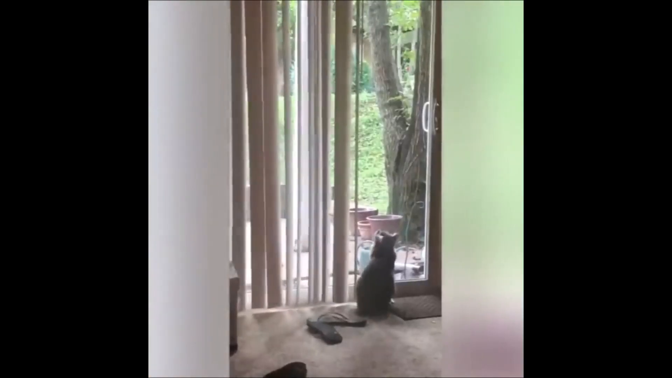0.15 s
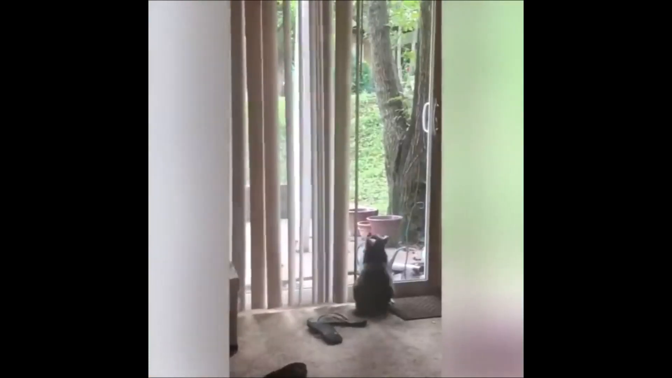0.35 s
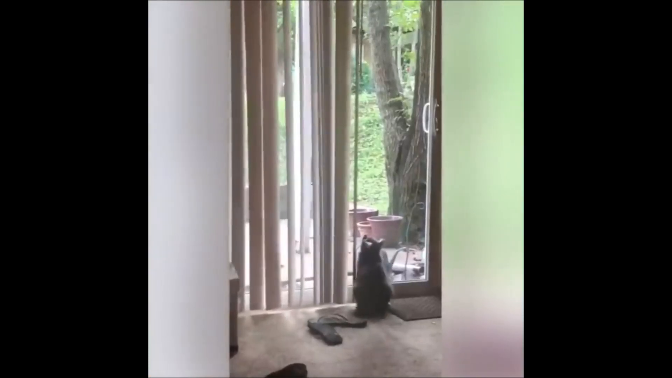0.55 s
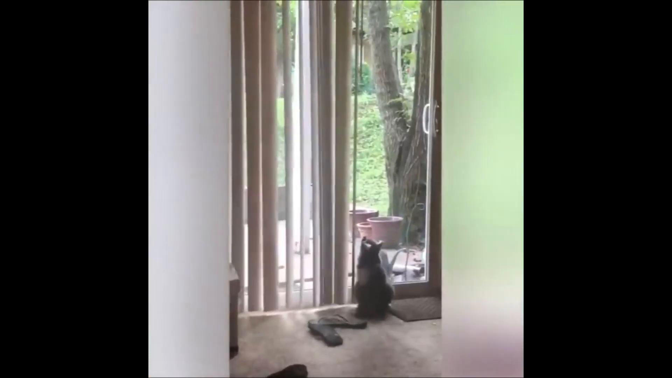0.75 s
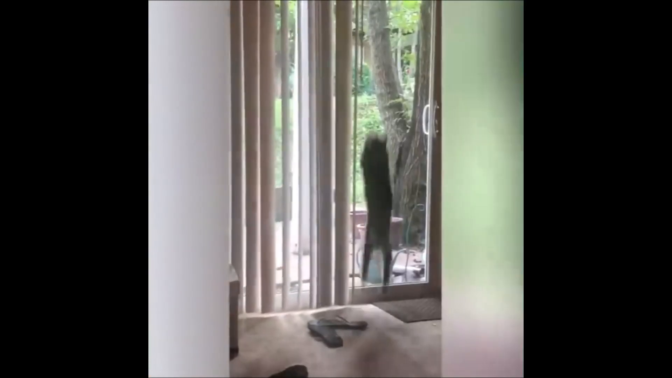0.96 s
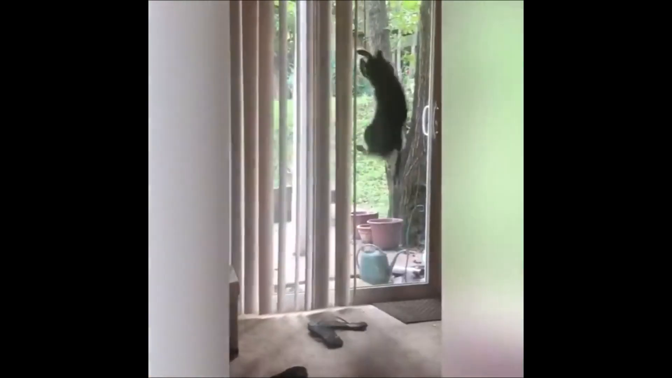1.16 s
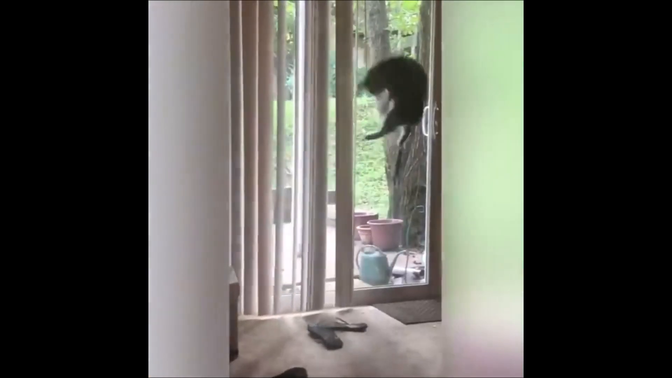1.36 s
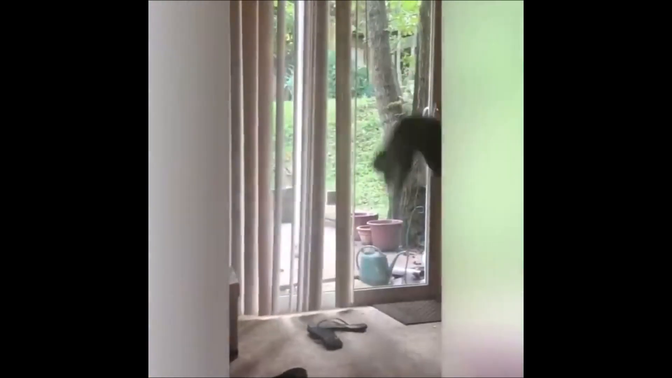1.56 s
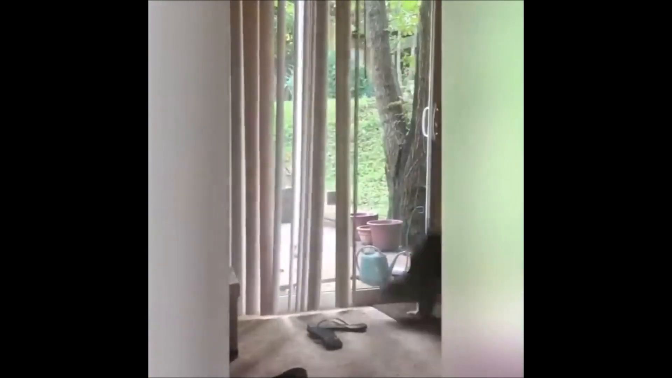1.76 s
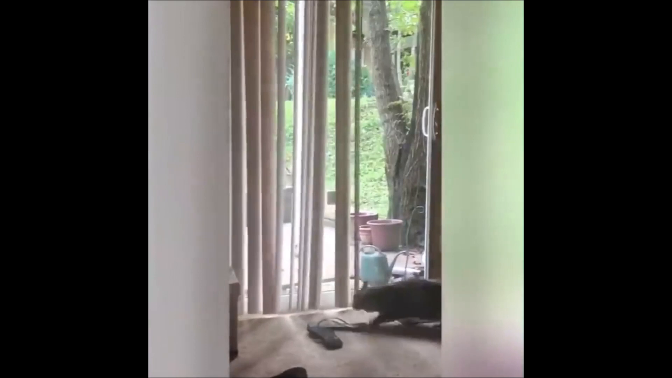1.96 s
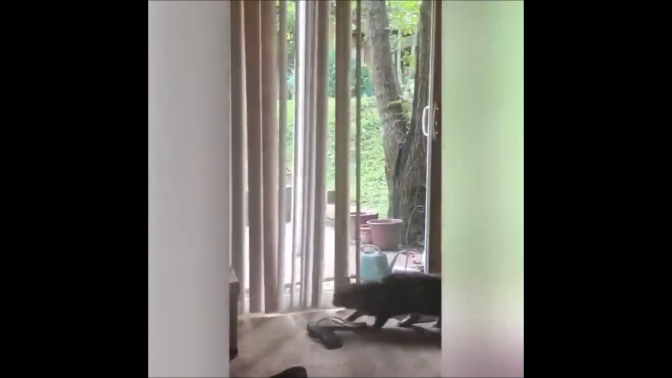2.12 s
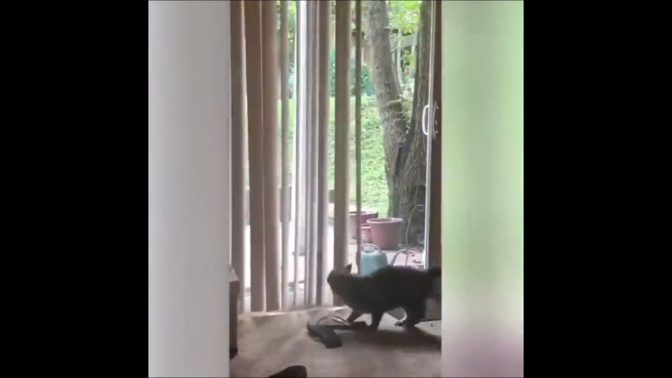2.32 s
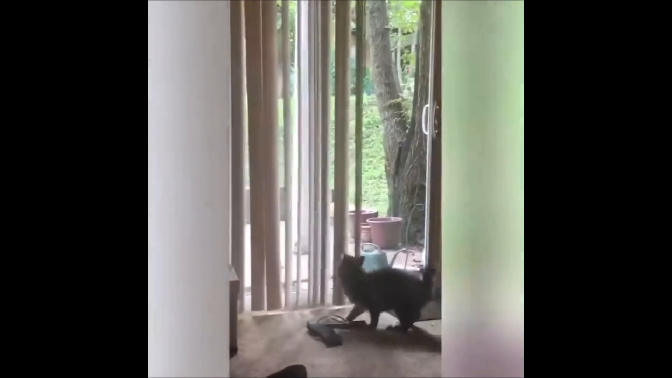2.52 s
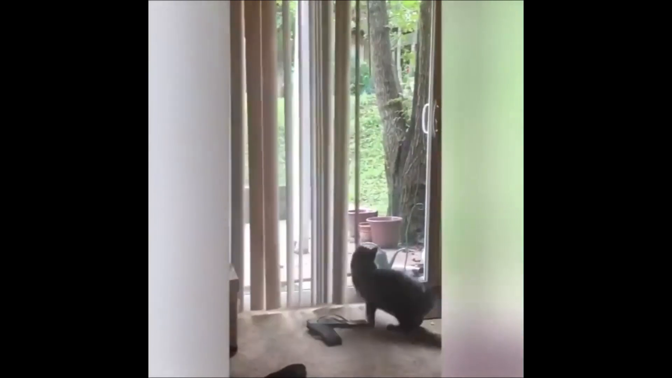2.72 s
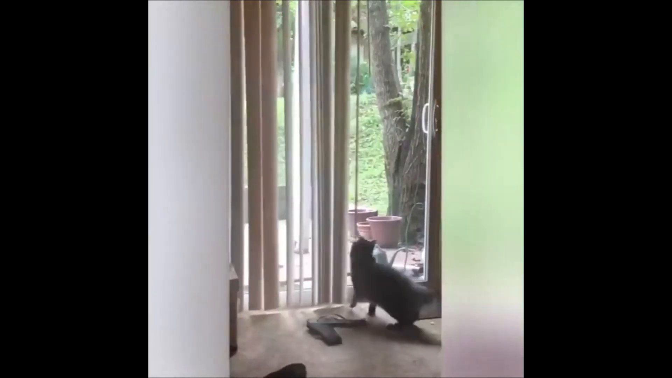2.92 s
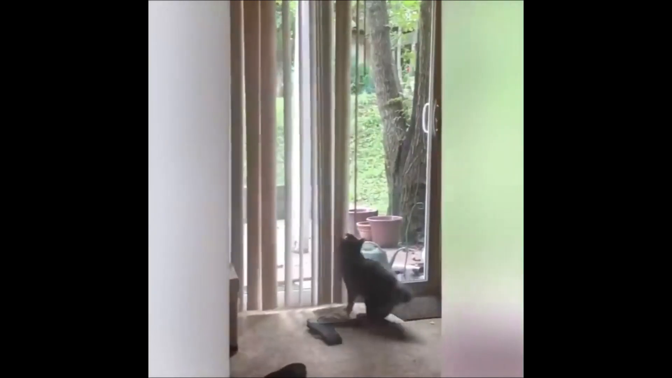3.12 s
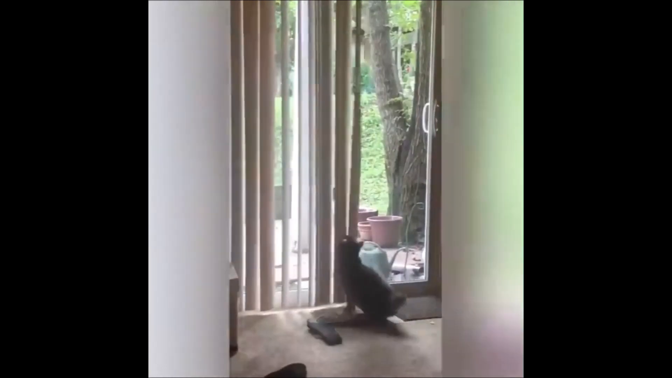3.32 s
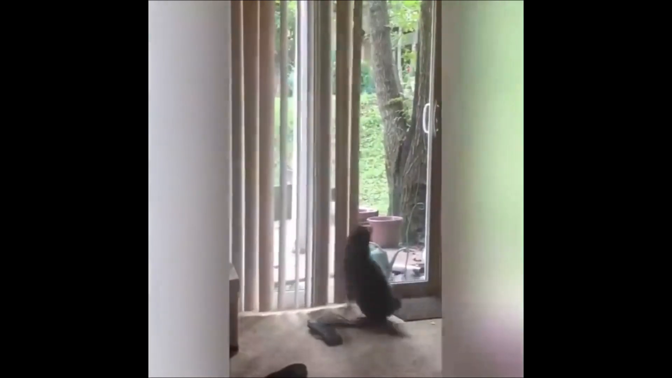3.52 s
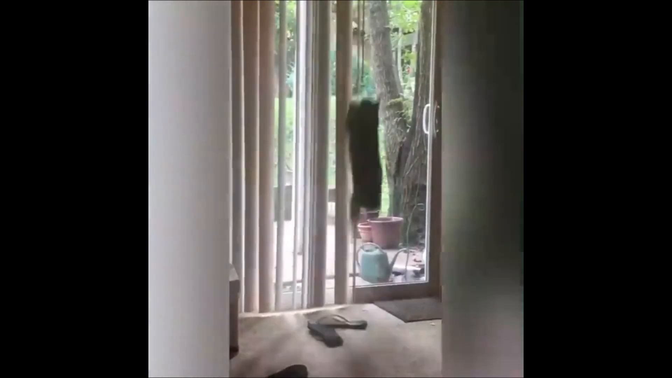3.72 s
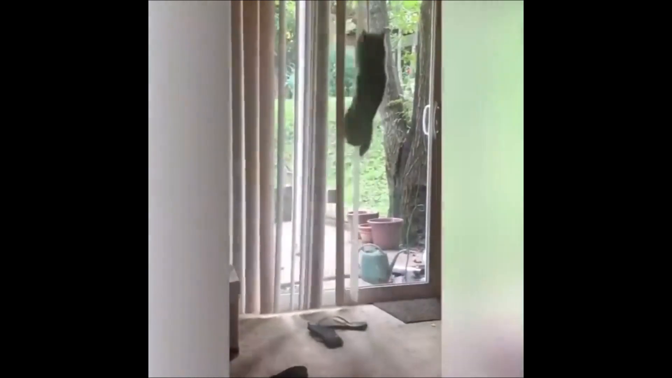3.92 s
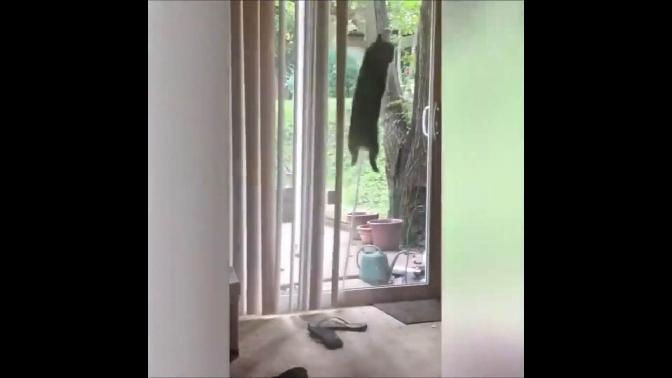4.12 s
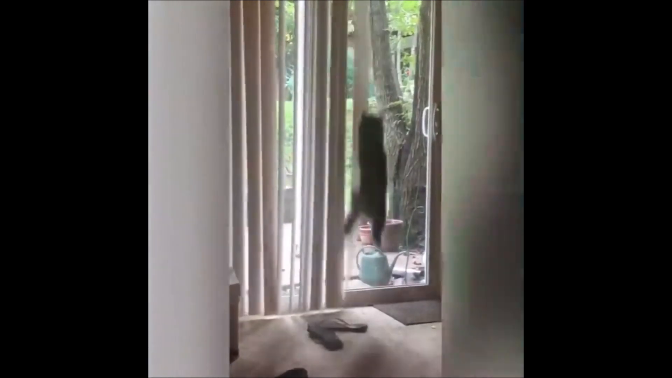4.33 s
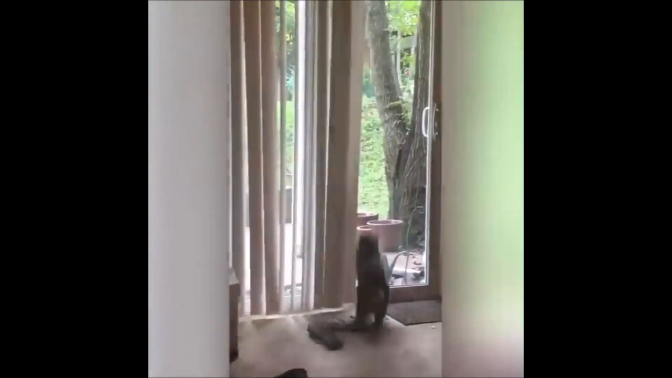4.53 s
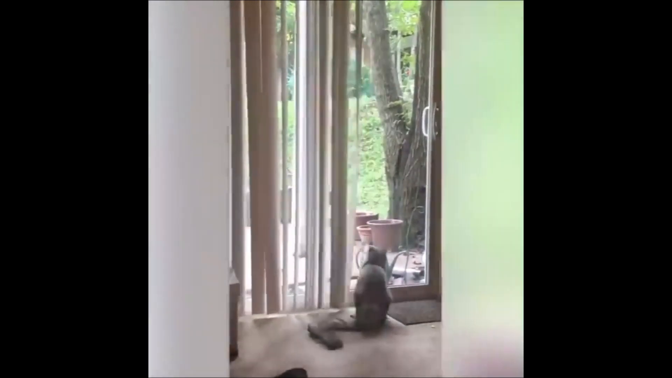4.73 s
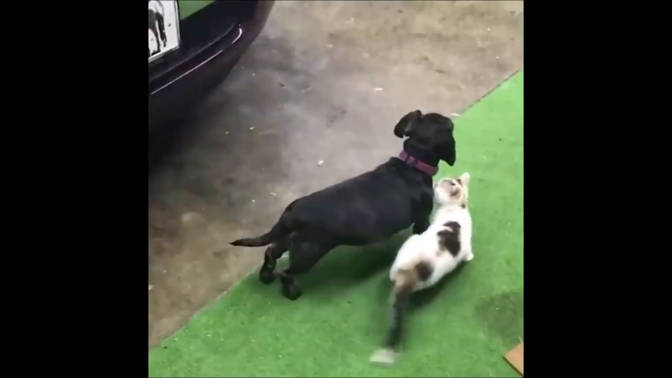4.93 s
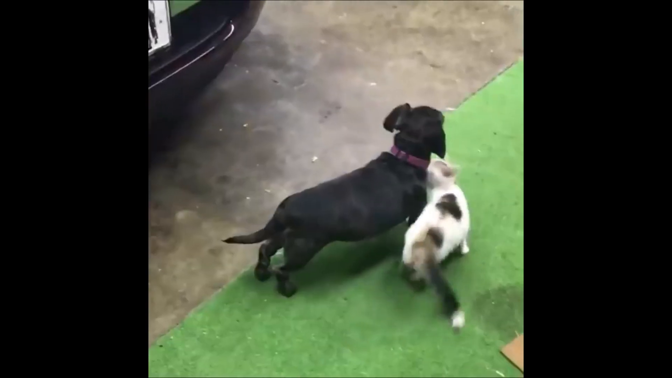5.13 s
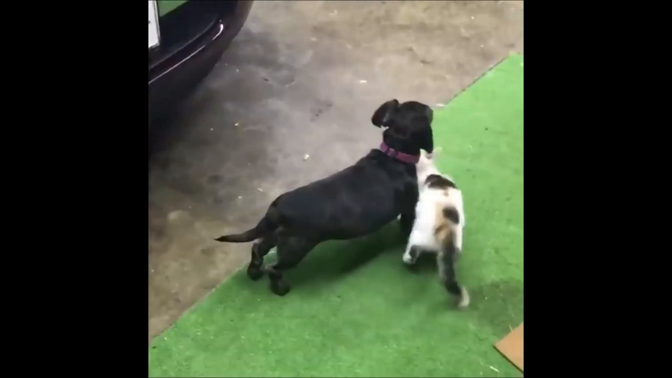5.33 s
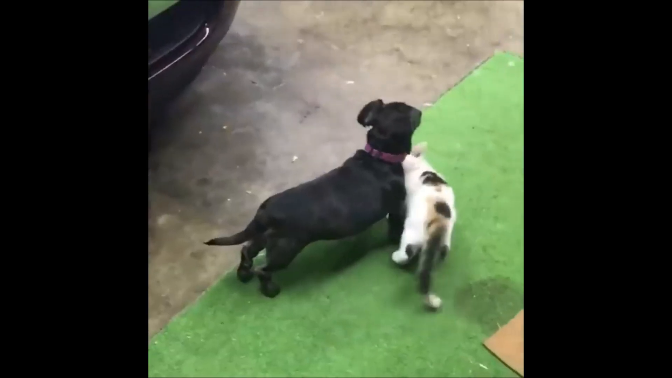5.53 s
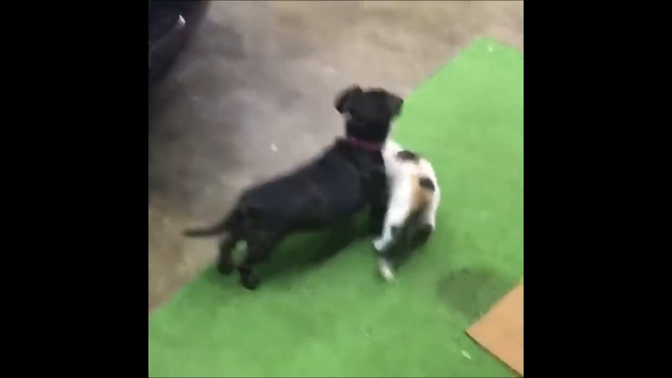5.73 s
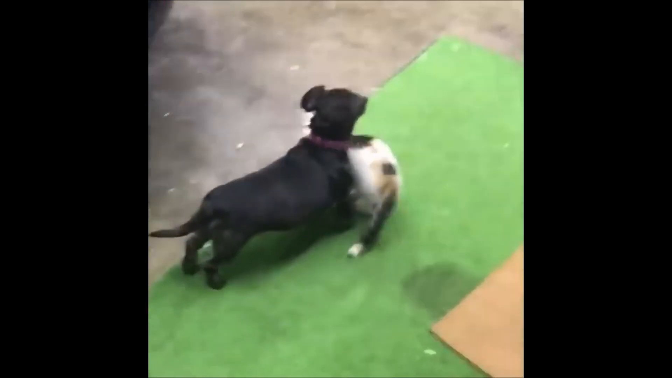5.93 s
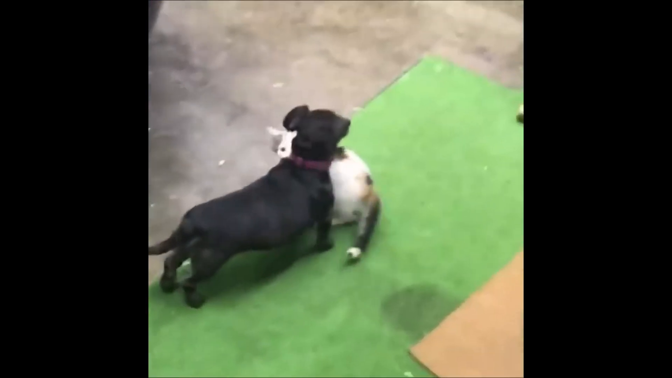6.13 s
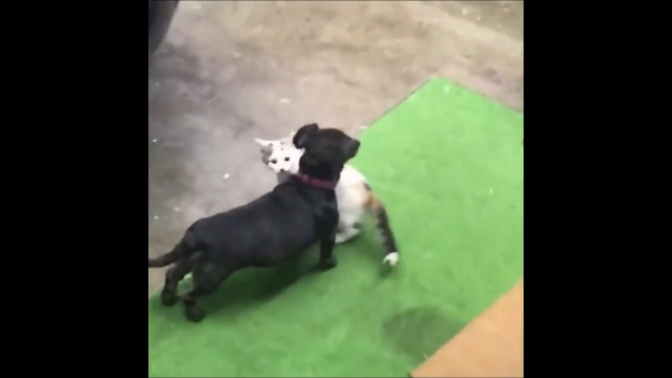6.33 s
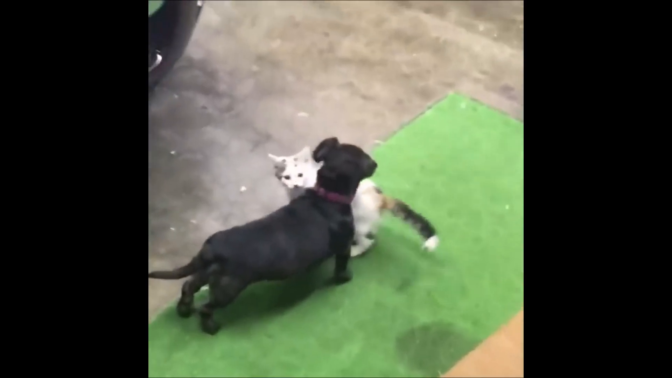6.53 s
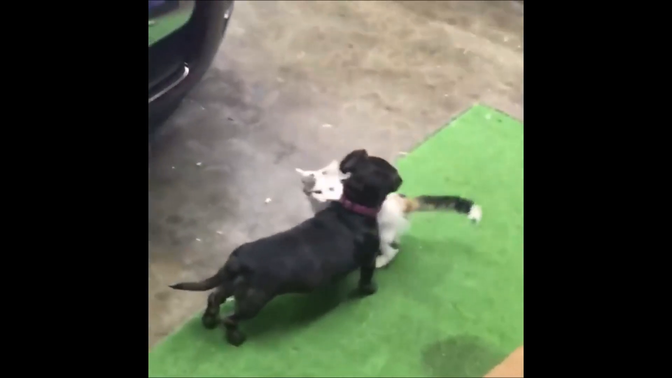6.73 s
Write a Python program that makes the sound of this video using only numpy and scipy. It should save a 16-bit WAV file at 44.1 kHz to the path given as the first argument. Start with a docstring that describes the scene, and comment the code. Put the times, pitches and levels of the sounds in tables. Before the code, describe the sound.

In a quiet humming room, hanging slats crash and chatter under a jumping cat; then an abrupt cut to faint carport air and a small scuff.

```python
"""A low ventilation rumble and room drone, then plastic vertical blinds clack, chatter and flex as a cat leaps
at them twice: the head rail rings, the door behind knocks, the cat thumps onto the carpet.
Then the scene changes to an open carport: rush, hum, and a dog and a cat rubbing with faint crackle and a scuff.
Contacts are short shaped impulses, rail and door are decaying modes, air and friction are coloured noise."""
import sys
import numpy as np
from scipy import signal
from scipy.fft import rfft, irfft, next_fast_len
from scipy.io import wavfile
from scipy.ndimage import map_coordinates

SR = 44100
rng = np.random.default_rng(int(sys.argv[2]) if len(sys.argv) > 2 else 0)


def inscribe(sig):
    """Save sig as 16-bit PCM at rate SR to the path in sys.argv[1].

    A 1-D sig is mono; a 2-D sig holds one channel per row.
    Samples are clipped to [-1, 1] before scaling.
    """
    pcm = np.round(np.clip(np.atleast_2d(sig).T, -1, 1) * 32767)
    wavfile.write(sys.argv[1], SR, pcm.astype(np.int16))


N = 302702
CHANGE_S = 4.986  # room to carport
CUTOFF_HZ = 15850

# ventilation rumble spectrum: freq_hz, relative_db_per_hz
ROOM_AIR_COLOUR = [(20, -38.5), (45, -19.5), (60, -14.5), (100, -8.5), (160, -3.5), (280, -10), (400, -16),
                   (700, -22), (1300, -32), (2600, -39), (4000, -40), (7000, -53.5), (12000, -60.5),
                   (15000, -78.5)]
# level of the room's low resonance: time_s, level_db
DRONE_LEVEL = [(0, -59.5), (1.7, -60.5), (1.95, -51.5), (2.7, -54), (3.3, -61), (4.45, -57), (5, -55)]
# spectrum of that resonance: freq_hz, relative_db_per_hz
DRONE_COLOUR = [(100, -55.0), (143, -17.5), (159, -0.5), (173, -16.5), (260, -50.5), (1000, -100)]
# room decay: freq_hz, t60_s
ROOM_T60 = [(150, 0.34), (600, 0.7), (1600, 0.57), (2700, 0.52), (4200, 0.57), (9000, 0.35), (16000, 0.32)]

# outdoor rush spectrum: freq_hz, relative_db_per_hz
YARD_AIR_COLOUR = [(22, -23), (42, -18.5), (60, 1), (85, -5), (120, 2), (150, -8), (300, -2.5),
                   (420, -11.5), (560, -9.5), (1400, -14.5), (3000, -21), (5000, -31), (10500, -41.5),
                   (15500, -45)]
# how hard the coats rub: time_s, level_db (before RUB_DB)
FUR_PRESSURE = [(5.6, -82), (5.99, -73), (6.306, -67.5), (6.376, -57.5), (6.506, -70.5), (6.656, -64),
                (6.86, -71)]
# rubbing hair spectrum: freq_hz, relative_db_per_hz
FUR_COLOUR = [(1000, -1), (3500, 6.5), (6500, 9), (9000, 7), (10500, 3), (12000, 5.5), (16000, 1.5)]
RUB_DB, TICK_RMS_RATIO = -2, 0.67  # hiss gain; ticks against noise
CRACKLE_START_S, CRACKLE_END_S = 5.8, 6.7
CRACKLES_PER_S, CRACKLE_DB, CRACKLE_SPREAD_DB = 16, -57, 5
# a light touch, then the scuff itself: peak_s, level_db
SCUFFS = [(5.858, -61.5), (5.926, -48)]
# scuff grit spectrum: freq_hz, relative_db_per_hz
SCUFF_COLOUR = [(300, -24), (750, -6), (1050, 1), (1300, -4), (1700, -16), (3200, -18.5), (5000, -26),
                (15000, -27.5)]
SCUFF_RISE_DB_PER_S, SCUFF_FALL_DB_PER_S = 414, 518
SCUFF_SNAP_DB = -4  # release snap against the scuff's level setting

# cat meets door or carpet, forepaws first: start_s, level_db, hardness_db, hind_delay_s
THUMPS = [(1.304, -43.5, -13, 0.0078), (1.891, -39.5, 6, .012), (1.946, -48.5, 0, 0.028),
          (1.996, -48.5, 6.5, 0.026), (3.996, -44, 3, 0.041), (4.602, -38.5, -1, .02)]
# a paw's thump spectrum: freq_hz, relative_db_per_hz
PAW_COLOUR = [(40, -26.5), (110, -4.5), (190, 5), (270, -5), (380, -12.5), (600, -14.5), (1500, -27.5),
              (3000, -37), (8000, -51.5)]
HIND_DB, HIND_HARDNESS_DB = -3, -7.5  # hind paws against forepaws

# pushes against the sliding door: start_s, level_db
KNOCKS = [(1.278, -46), (1.436, -51), (4.005, -58), (4.606, -51)]
# door modes: freq_hz, relative_db
DOOR_MODES = [(225, -6.5), (272, -9), (318, 0.5), (445, -10), (600, 5.5), (680, 1)]

# slats bend under the cat's weight and wobble back: start_s, level_db, rise_s, fade_s
FLEXES = [(1.272, -54, 0.0053, 0.015), (1.43, -47.5, .018, 0.064), (3.994, -49, .006, 0.028),
          (4.04, -51, 0.0064, 0.073), (4.612, -51, .005, 0.025), (4.712, -50, 0.011, 0.064)]
# bending slat spectrum: freq_hz, relative_db_per_hz
FLEX_COLOUR = [(100, -30.5), (200, -1.5), (300, 2), (400, -3), (520, -6.5), (660, -3), (830, -14),
               (1150, -12), (1800, -29), (5000, -58)]

# tugs that set the blind ringing: start_s, rail_db, hangers_db, slats_db
TUGS = [(1.262, -33, -45, -36), (1.42, -61.5, -41, -43), (3.428, -80, -78, -63), (3.49, -71, -67.5, -61),
        (4.007, -69, -58, -57), (4.046, -60, -54.5, -53), (4.446, -71, -62, -50), (4.490, -47.5, -60, -52),
        (4.701, -54, -44, -45)]
# head rail modes: freq_hz, relative_db
RAIL_MODES = [(2180, -56), (2288, -54), (3018, -54), (3249, -55), (3271, -52), (3393, -54.5), (3422, -56.5),
              (3446, -50), (3644, -56), (4086, -62), (4212, -54.5), (4404, -52), (4677, -56.5), (5120, -53),
              (5432, -55), (5620, -60.5), (6035, -63.5), (6156, -54), (6315, -57.5), (6366, -54),
              (8394, -56.5)]
# hanger modes: freq_hz, relative_db
HANGER_MODES = [(3128, -82.5), (3521, -68.5), (4000, -65.5), (4048, -62), (4954, -72), (5163, -71.5),
                (5679, -74.5), (6045, -74), (6546, -74), (6923, -73.5), (7025, -70.5), (7332, -74.5),
                (7704, -70.5), (8058, -73), (8479, -74), (8791, -75), (9184, -72.5), (9555, -69.5),
                (12107, -65.5), (12812, -78), (13932, -78.5), (15170, -75.5)]
# hanging slat modes: freq_hz, relative_db
SLAT_MODES = [(1440, -4), (1486, -1), (1532, -3), (1562, 1), (1634, -1.5), (1696, -1.5), (1730, -3),
              (1790, -7), (1868, -8.5)]

# slats slide and chatter over each other: start_s, level_db, treble_db, body_db, rise_s, fade_s
RATTLES = [(1.112, -51, -29, -3, .001, 0.0091), (1.2544, -24, -11, 0, 0.01, 0.007),
           (1.267, -24, -4, 0, .001, 0.012), (1.299, -30.5, -25, -7, .004, 0.0083),
           (1.322, -34.5, -15, 4, .008, 0.029), (1.4183, -26.5, -5, 2, 0.0011, 0.011),
           (1.971, -55.5, -8.5, 3.5, .001, 0.0093), (2.393, -54, -16, 14.5, .002, 0.041),
           (3.425, -57, -17, 23, 0.0032, 0.033), (3.474, -49, -15, 16, .01, 0.03),
           (3.533, -50.5, -28, 9.5, 0.0072, 0.012), (3.998, -43, -14, 9, 0.0094, 0.029),
           (4.036, -40.5, -22, 14, 0.0057, 0.03), (4.083, -42, -10, 20, .007, 0.029),
           (4.124, -39, -15, -1, 0.009, 0.027), (4.163, -46, -20.5, 3, .004, 0.052),
           (4.272, -42, -15, 2, 0.0036, 0.0072), (4.445, -46, -11, 14, .012, 0.014),
           (4.476, -38, -7, -5, .005, 0.008), (4.517, -43, -22, 10, 0.0055, .022),
           (4.608, -39, -16, 5, .006, 0.012), (4.681, -37, -14, 3, .002, 0.015),
           (4.694, -30, -5, -1, 0.0055, .018), (4.902, -43, -11, 17, 0.0015, 0.032)]
# slat snaps against its neighbour: start_s, level_db, treble_db, body_db, edge_db, room_db
CLACKS = [(1.2625, -19, -10, -8, 2, -7.5), (1.2676, -22, -14, -2, 8, -3), (1.2710, -21, -5, 1, -4, -4),
          (1.2736, -25, -11, -4, 4, -7), (1.287, -26.5, -15, -3, -1, -2), (1.3098, -29, -15, -5, -1, -1.5),
          (1.3144, -31, -15, -8, -1, -1), (1.353, -34, -12, -5, 2, -6), (1.3932, -29.5, -14, -8, 3, -6),
          (1.4183, -30.5, -5, -4, -4, -3), (1.4237, -29.5, -6, 0, -6, -2), (1.428, -28.5, -10, 6, -6, -1.5),
          (2.394, -54.5, -20, 9, -10, -0.5), (3.4314, -58, -15, 3.5, -0.5, -1),
          (3.488, -51, -3, -5, -1, -7), (3.544, -49.5, -20, 1, 1, -5), (3.5505, -53, -22, 8, 1, -2),
          (3.848, -54.5, -30, 12.5, 0, 5.5), (3.999, -46, -16, -6, -3, 3), (4.0079, -48.5, -15, 13, 0, 0),
          (4.0385, -41.5, -18, 0, 0, -1), (4.0426, -38.5, -18, -1, 4, -13), (4.05, -45, -26, 11, -1, -1),
          (4.0866, -48, -7, -6, 0, -5), (4.094, -40, -8, 0, -4, -9), (4.17, -46, -25, -1, -4, -7),
          (4.285, -31.5, -20, 1.5, 7, -6.5), (4.3193, -36.5, -23, -1, 4, -4),
          (4.462, -35.5, -18, 5, -2, -3), (4.4877, -29, -15.5, -5, 1, -1.5), (4.4983, -41, -22, 0, -2, -5),
          (4.5198, -39, -23, -5, -6, -4), (4.615, -42, -13, -2, -4, -7), (4.6813, -43, -13, 2, 2, 3),
          (4.6973, -32, -10, -9, -7, -9), (4.7022, -30.5, -10, 0, -6, -6), (4.706, -29.5, -16, -1, -3, -4),
          (4.904, -42.5, -6, -1, -3, -4)]
# a struck slat's spectrum: freq_hz, relative_db_per_hz
SLAT_COLOUR = [(100, -19.5), (300, -9), (600, -11.5), (850, -12), (1300, -7), (1560, 1.5), (1780, -3.5),
               (2150, -4), (2650, -9.5), (3150, -4), (5000, -4.5), (8500, -4), (12000, -8.5),
               (13700, -13.5), (15600, -15)]
EDGE_HZ, EDGE_WIDTH_HZ = 3280, 600
SLAT_SPREAD_DB = 2.8


def amp(db):
    """Decibels to gain."""
    return 10 ** (np.asarray(db) / 20)


def unit(x):
    """Scale to rms 1."""
    return x / np.sqrt(np.mean(x ** 2) + 1e-20)


def along(points, hz):
    """Interpolate (freq_hz, value) points on a log frequency axis."""
    point_hz, values = np.transpose(points)
    return np.interp(np.log(hz + 1), np.log(point_hz + 1), values)


def level(rows):
    """(time_s, level_db) rows to a gain per sample, silent outside them."""
    return amp(np.interp(np.arange(N) / SR, *np.transpose(rows), left=-200, right=-200))


def filtered(x, response):
    """Multiply the spectrum of x by a response of frequency."""
    size = next_fast_len(len(x) + SR // 4)
    spectrum = rfft(x, size) * response(np.fft.rfftfreq(size, 1 / SR))
    return irfft(spectrum, size)[:len(x)]


def coloured(x, spectrum):
    """Shape x by (freq_hz, db) points, at rms 1."""
    return unit(filtered(x, lambda hz: amp(along(spectrum, hz))))


def causal(gain_db, size=2048):
    """Minimum-phase impulse response of energy 1 with the given dB response."""
    cepstrum = irfft(np.log(amp(gain_db(np.fft.rfftfreq(size, 1 / SR)))))
    # fold onto positive time
    cepstrum[1:size // 2] *= 2
    cepstrum[size // 2 + 1:] = 0
    impulse = irfft(np.exp(rfft(cepstrum)))
    return impulse / np.linalg.norm(impulse)


def add(track, start_s, sound):
    """Mix a sound into the track at start_s."""
    part = track[round(start_s * SR):][:len(sound)]
    part += sound[:len(part)]


def grains(count, rate_hz, spread_db):
    """Tiny impacts of uneven size at random moments, rms 1."""
    hits = rng.random(count) < rate_hz / SR
    sizes = rng.standard_normal(count) * amp(spread_db * rng.standard_normal(count))
    return unit(hits * sizes)


def swell(t, rise_s, fade_s):
    """Envelope that builds up and dies away, peak 1."""
    shape = (1 - np.exp(-t / max(rise_s, .0005))) * np.exp(-t / max(fade_s, .002))
    return shape / shape.max()


def in_room(x, early_db, early_t60_s, tail_db):
    """Direct sound, quick echoes off door and floor, and a tail whose decay varies with frequency."""
    hz, frame_s, noise = signal.stft(rng.standard_normal(SR * 3 // 4), SR, nperseg=256)
    decay = amp(-60 * frame_s / along(ROOM_T60, hz)[:, None])
    tail = signal.istft(noise * decay, SR, nperseg=256)[1]
    t = np.arange(len(tail)) / SR
    tail *= 1 - np.exp(-t / 0.0043)
    early = grains(len(t), rate_hz=4600, spread_db=4.0) * amp(-60 * t / early_t60_s)
    response = amp(early_db) * early / np.linalg.norm(early)
    response += amp(tail_db) * tail / np.linalg.norm(tail)
    response[0] += 1  # direct sound
    return signal.fftconvolve(x, response)


def ringing(modes, t60_4khz_s, detune_hz):
    """Modes struck at random strengths, each a detuned, beating pair; high ones die sooner."""
    t = np.arange(SR * 3 // 4) / SR
    hz, mode_db = np.repeat(modes, 2, axis=0).T[:, :, None]
    hz = hz + detune_hz * rng.standard_normal(hz.shape)
    strength = amp(mode_db + 2 * rng.standard_normal(hz.shape))
    waves = np.sin(2 * np.pi * (hz * t + rng.random(hz.shape)))
    decay = amp(-60 * t / t60_4khz_s * (hz / 4000) ** 0.51)
    mix = (strength * waves * decay).sum(0) / np.linalg.norm(strength)
    return mix * (1 - np.exp(-t / 0.0032))  # soft onset


def room_air():
    """Ventilation rumble, with a narrow low drone where the room resonates."""
    rumble = amp(-54.0) * coloured(rng.standard_normal(N), ROOM_AIR_COLOUR)
    drone = coloured(rng.standard_normal(N), DRONE_COLOUR)
    return rumble + level(DRONE_LEVEL) * drone


def crackle(level_db):
    """One tiny, bright snap: a short impulse shaped by the hair spectrum."""
    tilt = [(6000, 1), (13000, 8.6)]
    return amp(level_db + 15.0) * causal(lambda hz: along(FUR_COLOUR, hz) + along(tilt, hz))


def fur():
    """Soft hiss of hairs, with fine ticks and random crackles where they catch and let go."""
    ticks = unit((rng.random(N) < 90 / SR) * rng.uniform(.3, 1, N))
    friction = rng.standard_normal(N) + TICK_RMS_RATIO * ticks
    out = amp(RUB_DB) * level(FUR_PRESSURE) * coloured(friction, FUR_COLOUR)
    # one crackle at a random moment in each slot
    slots_s = np.arange(CRACKLE_START_S, CRACKLE_END_S, 1 / CRACKLES_PER_S)
    for slot_s, (late, size) in zip(slots_s, rng.random((len(slots_s), 2))):
        level_db = CRACKLE_DB + CRACKLE_SPREAD_DB * (2 * size - 1)
        add(out, slot_s + late / CRACKLES_PER_S, crackle(level_db))
    return out


def scuffs():
    """Gritty friction that builds up, lets go with a snap and dies away."""
    t = np.arange(N) / SR
    stroke = np.zeros(N)
    for peak_s, level_db in SCUFFS:
        drop_db = np.maximum(SCUFF_RISE_DB_PER_S * (peak_s - t), SCUFF_FALL_DB_PER_S * (t - peak_s))
        stroke += amp(level_db - drop_db)
    out = stroke * coloured(grains(N, rate_hz=6900, spread_db=2.5), SCUFF_COLOUR)
    for peak_s, level_db in SCUFFS:
        add(out, peak_s, crackle(level_db + SCUFF_SNAP_DB))
    return out


def carport():
    """Distant outdoor rush with a low sine hum, coats crackling as they rub, and a short scuff."""
    air = amp(-59) * coloured(rng.standard_normal(N), YARD_AIR_COLOUR)
    hum = amp(-66.0) * np.sin(2 * np.pi * 59.5 * np.arange(N) / SR)
    return air + hum + fur() + scuffs()


def thump(level_db, hardness_db):
    """A soft, heavy contact that booms in the room; a harder one also knocks."""
    tilt = [(300, 1.0), (900, hardness_db), (2500, hardness_db), (9000, -3.0)]
    push = causal(lambda hz: along(PAW_COLOUR, hz) + along(tilt, hz))
    return amp(level_db + 15.5) * in_room(push, early_db=4.5, early_t60_s=0.1, tail_db=4.5)


def thumps():
    """Forepaws land first, softer hind paws just after."""
    out = np.zeros(N)
    for start_s, level_db, hardness_db, hind_delay_s in THUMPS:
        add(out, start_s, thump(level_db, hardness_db))
        hind = thump(level_db + HIND_DB, hardness_db + HIND_HARDNESS_DB)
        add(out, start_s + hind_delay_s, hind)
    return out


def door():
    """The sliding door behind the blinds answers a push with a hollow, modal knock."""
    out = np.zeros(N)
    for start_s, level_db in KNOCKS:
        add(out, start_s, amp(level_db) * ringing(DOOR_MODES, t60_4khz_s=0.096, detune_hz=10))
    return out


def flexes():
    """Bent slats flutter with a dull, hollow wobble of low noise."""
    t = np.arange(SR // 2) / SR
    out = np.zeros(N)
    for start_s, level_db, rise_s, fade_s in FLEXES:
        wobble = coloured(rng.standard_normal(len(t)), FLEX_COLOUR) * swell(t, rise_s, fade_s)
        wet = in_room(wobble, early_db=-9.5, early_t60_s=0.042, tail_db=-7.5)
        add(out, start_s, amp(level_db) * wet)
    return out


def rail():
    """Each tug rings the metal head rail, the hangers that ride in it and the slats below."""
    out = np.zeros(N)
    for start_s, rail_db, hangers_db, slats_db in TUGS:
        add(out, start_s, amp(rail_db) * ringing(RAIL_MODES, t60_4khz_s=0.49, detune_hz=3))
        add(out, start_s, amp(hangers_db) * ringing(HANGER_MODES, t60_4khz_s=0.42, detune_hz=10))
        add(out, start_s, amp(slats_db) * ringing(SLAT_MODES, t60_4khz_s=0.2, detune_hz=4.5))
    return out


def slat(treble_db, body_db, edge_db=0, delay_1khz_s=.001):
    """Slat response: hard contacts are brighter, heavy ones fuller, edge-on ones have a pitched clack."""
    tilt = [(550, body_db), (1500, body_db / 2), (3200, 0), (11000, treble_db + 10.5)]
    # every slat, touched at another spot, has its own set of short resonances
    knots = rng.standard_normal(1024)

    def gain_db(hz):
        edge = edge_db * np.exp(-((hz - EDGE_HZ) / EDGE_WIDTH_HZ) ** 2)
        ripple = SLAT_SPREAD_DB * map_coordinates(knots, [hz / 80], mode="mirror")
        return along(SLAT_COLOUR, hz) + along(tilt, hz) + edge + ripple

    # bending waves travel slower at low frequencies, which smears the click
    return filtered(causal(gain_db), lambda hz: np.exp(-4j * np.pi * delay_1khz_s * np.sqrt(hz * 1e3)))


def rattle(level_db, treble_db, body_db, rise_s, fade_s):
    """A burst of many tiny contacts that swells and fades as the slats slide."""
    t = np.arange(SR // 6) / SR
    force = grains(len(t), rate_hz=4000, spread_db=1.0) * swell(t, rise_s, fade_s)
    chatter = signal.fftconvolve(force, slat(treble_db, body_db))
    return amp(level_db - 10.5) * in_room(chatter, early_db=-3, early_t60_s=0.04, tail_db=-2.5)


def rattles():
    """Slats brush past each other as they swing or are pawed."""
    out = np.zeros(N)
    for start_s, *settings in RATTLES:
        add(out, start_s, rattle(*settings))
    return out


def clack(level_db, treble_db, body_db, edge_db, room_db):
    """One sharp contact, with a brief noise buzz as the edges settle."""
    t = np.arange(SR // 40) / SR
    force = .27 * rng.standard_normal(len(t)) * np.exp(-t / .0011)
    force[0] = 1
    force /= np.linalg.norm(force)
    contact = signal.fftconvolve(force, slat(treble_db, body_db, edge_db))
    wet = in_room(contact, early_db=room_db + 4.0, early_t60_s=0.12, tail_db=room_db)
    return amp(level_db + 12.5) * wet


def clacks():
    """Slats snap together and rebound."""
    out = np.zeros(N)
    for start_s, *settings in CLACKS:
        add(out, start_s, clack(*settings))
    return out


def scene():
    """The room first, then all at once the carport."""
    indoors = room_air() + thumps() + door() + flexes() + rail() + rattles() + clacks()
    return np.where(np.arange(N) / SR < CHANGE_S, indoors, carport())[None]


def record(dry):
    """Upper band limit of the sound: a smooth 400 Hz wide roll-off centred on CUTOFF_HZ."""
    def band_limit(hz):
        edge = np.clip((CUTOFF_HZ + 200 - hz) / 400, 0, 1)
        return np.sin(np.pi / 2 * edge) ** 2

    return np.array([filtered(channel, band_limit) for channel in dry])


dry = scene()
out = record(dry)
inscribe(out)
```